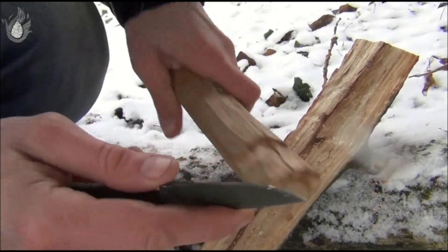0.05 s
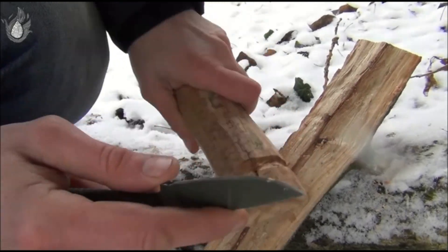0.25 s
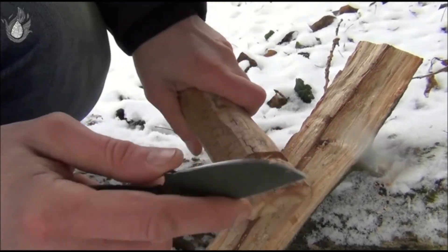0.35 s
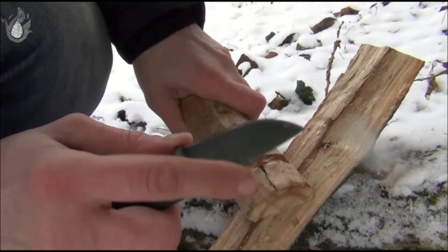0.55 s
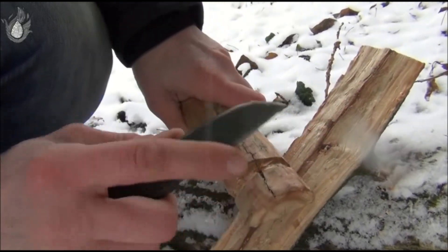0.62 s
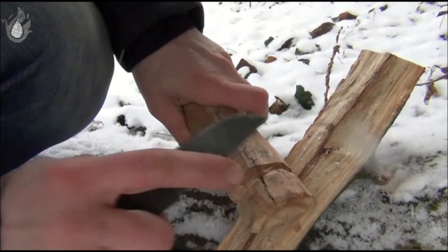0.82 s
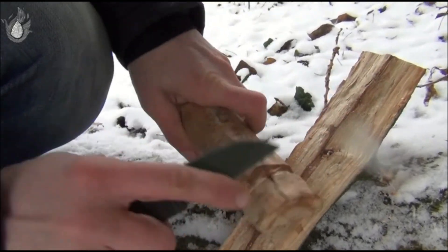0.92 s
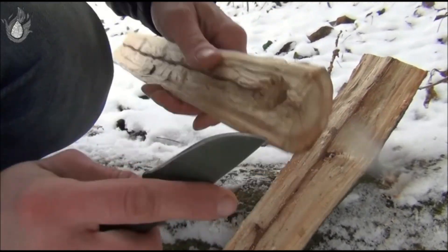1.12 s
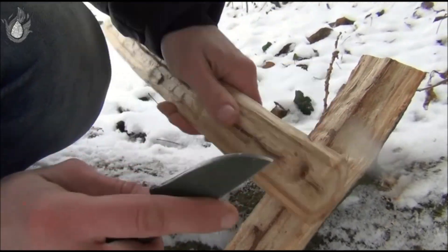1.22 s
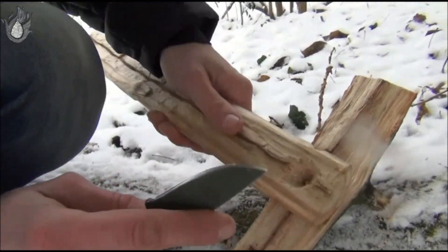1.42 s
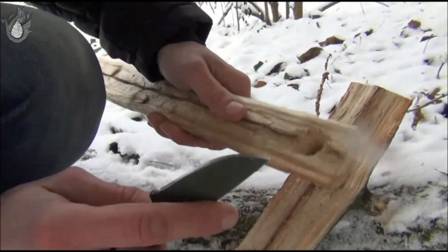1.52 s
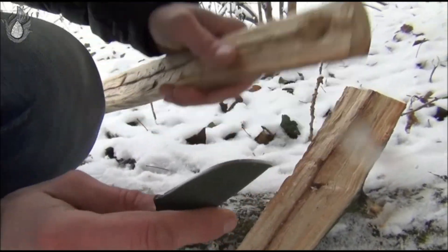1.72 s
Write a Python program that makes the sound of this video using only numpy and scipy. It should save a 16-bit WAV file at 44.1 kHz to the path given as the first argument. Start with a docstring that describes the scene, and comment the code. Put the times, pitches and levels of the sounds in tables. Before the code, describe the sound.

Wood knocks on wood six times, close to the microphone, each knock short and damped, the third brightest. Soft clothing rustle, one brief wooden slide and a few tiny bark ticks fill the gaps in a quiet outdoor setting.

```python
"""Snowy ground, close up: a split billet is set against a log in six dry knocks.
Each contact rings the wood's modes over a short crack, thumps the log and settles with a second touch;
the grip damps the ring. Around the knocks sleeves brush, grit and bark tick, and the wood bumps and
slides on wood. The surroundings return a short scatter over a faint outdoor hush."""
import sys
import numpy as np
from scipy import signal
from scipy.fft import rfft, irfft, next_fast_len
from scipy.io import wavfile
from scipy.ndimage import uniform_filter1d

SR = 44100
rng = np.random.default_rng(int(sys.argv[2]) if len(sys.argv) > 2 else 0)


def wrap_up_sound(samples):
    """Save the sound to the file named by the first command line argument, as 16-bit audio."""
    columns = np.atleast_2d(samples).T
    # keep every value between -1 and 1, then stretch to whole-number steps
    tamed = np.clip(columns, -1, 1)
    steps = np.round(tamed * 32767).astype(np.int16)
    wavfile.write(sys.argv[1], SR, steps)


N = 77175
CONTACT_S = 0.25


def amp(db):
    """Decibels to gain."""
    return 10 ** (np.asarray(db) / 20)


def unit(x):
    """Scale to rms 1."""
    return x / np.sqrt(np.mean(x ** 2) + 1e-20)


def along(hz, points):
    """Read (Hz, value) points on a log-frequency axis."""
    freqs, values = np.array(points, float).T
    return np.interp(np.log(np.maximum(hz, 1)), np.log(freqs), values)


def colour(x, points):
    """Minimum-phase filter through (Hz, dB) points."""
    n = 2 * next_fast_len(len(x))
    gain = amp(along(np.fft.rfftfreq(n, 1 / SR), points))
    cepstrum = irfft(np.log(gain), n)
    cepstrum[1:n // 2] *= 2
    cepstrum[n // 2 + 1:] = 0
    return irfft(rfft(x, n) * np.exp(rfft(cepstrum)), n)[:len(x)]


def add(out, x, start_s):
    """Mix x into out."""
    i = min(max(int(start_s * SR), 0), len(out))
    out[i:i + len(x)] += x[:len(out) - i]


def fade(t, t60_s):
    """Exponential decay, 60 dB in t60_s."""
    return np.exp(-np.log(1000) * t / t60_s)


def waver(rate_hz):
    """Slewed random steps, rms 1."""
    hold = int(SR / rate_hz)
    steps = np.repeat(rng.standard_normal(N // hold + 1), hold)
    return unit(uniform_filter1d(steps, hold)[:N])


# Outdoor background. Each row: frequency in Hz, relative spectral level in dB.
HUSH_SPECTRUM = [(20, -33), (35, -1), (55, 0.5), (85, -1), (125, -3), (200, -8), (350, -15), (650, -12),
                 (1200, -17.5), (2000, -22), (3500, -28.5), (7000, -38.5), (12000, -36.5), (16000, -27)]
# Its width. Each row: frequency in Hz, side minus mid in dB.
HUSH_WIDTH = [(30, 1), (80, -27), (300, -17.5), (1000, -28), (6000, -22.5), (12000, -8)]


def hush(level_db=-54.5, waver_db=0.4):
    """Low outdoor background, mostly alike in both ears."""
    mid, side = (unit(colour(rng.standard_normal(N), HUSH_SPECTRUM)) for _ in range(2))
    ears = mid + colour(side, HUSH_WIDTH) * np.array([[1], [-1]])
    return amp(level_db + waver_db * waver(rate_hz=7)) * ears


def rubbing(strokes, spectrum, flutter_db, catches_per_s=3700, spread_db=1.5):
    """Fibres catch and let go in dense tiny clicks; each stroke swells and dies unevenly."""
    t = np.arange(N) / SR
    power = 0
    for peak_s, rise_s, fall_s, db in strokes:
        width_s = np.where(t < peak_s, rise_s, fall_s)
        power += amp(db) ** 2 * np.exp(-2 * ((t - peak_s) / width_s) ** 2)
    catches = (rng.random(N) < catches_per_s / SR) * rng.choice([-1, 1], N)
    strength = amp(spread_db * np.minimum(rng.exponential(size=N), 4))
    friction = 0.86 * unit(catches * strength) + rng.standard_normal(N)
    flutter = amp(flutter_db * waver(rate_hz=89.5))
    return np.sqrt(power) * flutter * unit(colour(friction, spectrum))


# Arm movements. Each row: peak time, rise and fall in seconds, level in dB.
SLEEVE_STROKES = [(.06, 0.27, 0.024, -58.5), (.165, 0.083, 0.069, -54), (.288, 0.01, 0.011, -57),
                  (.365, 0.066, 0.063, -49), (.525, 0.023, 0.013, -59), (.595, 0.038, 0.023, -56.5),
                  (.665, 0.048, 0.02, -55), (.755, 0.11, 0.032, -62.5), (.9, 0.12, 0.15, -60),
                  (1.076, 0.026, 0.041, -50.5), (1.17, 0.054, .04, -50.5), (1.38, 0.21, 0.096, -59)]
# Cloth friction. Each row: frequency in Hz, relative level in dB.
SLEEVE_SPECTRUM = [(400, -4.5), (1000, 2), (1800, 1.5), (3000, 2), (4500, 2), (7000, 0), (11500, -0.5),
                   (14000, -1), (16000, -1)]


def sleeves():
    """Cloth brushes in soft, broadband strokes."""
    return rubbing(SLEEVE_STROKES, SLEEVE_SPECTRUM, flutter_db=2.0)


def taps(contacts, decay_s, half_width_octaves):
    """Light contacts: short noise bursts, each around one frequency."""
    out, t = np.zeros(N), np.arange(int(CONTACT_S * SR)) / SR
    hz = np.fft.rfftfreq(len(t), 1 / SR) + 1
    for start_s, db, centre_hz in contacts:
        rolloff = 1 + (np.log2(hz / centre_hz) / half_width_octaves) ** 2
        band = unit(irfft(rfft(rng.standard_normal(len(t))) / rolloff, len(t)))
        add(out, 2 * amp(db) * band * np.exp(-t / decay_s), start_s)
    return out


# Grit and bark contacts. Each row: start in seconds, relative level in dB, centre in Hz.
GRIT_TICKS = [(.003, -48.5, 9700), (1.390, -62, 7000), (1.497, -59, 7140), (1.587, -54.5, 8500),
              (1.587, -60, 4700), (1.622, -65, 7100)]


def grit():
    """Grit and bark give tiny bright ticks."""
    return taps(GRIT_TICKS, decay_s=0.0011, half_width_octaves=0.28)


# Wood modes. Each row: frequency in Hz, relative dB struck on the side, the same at the tip,
# nominal T60 in seconds.
BILLET_MODES = [(251.5, -12, -16, 0.079), (337, -1.5, -12, 0.038), (620.7, -6, 3.5, 0.045),
                (710, -3.5, -10, 0.01), (869, -9, -20, 0.074), (995, -5.5, -50, 0.12),
                (1090, -48, -17, 0.039), (1225, 2, -9, 0.064), (1348, 1, 4.5, 0.043), (1496, 0.5, 0, 0.027),
                (1738, -15, -27, 0.046), (2060, -9, -3, .028), (2420, -25, -10, 0.038),
                (2670, -50, -12, 0.043), (2690, -51, -16, .028), (3474, -35, -14, 0.017),
                (3380, -38, -9, 0.038), (4384, -22, -15, 0.048), (6880, -39, 4, 0.019),
                (9160, -36, 5, 0.015)]


def billet(t, ring_factor, bend_hz, clack_hz, place, grip_hz=600, delay_1khz_s=0.000903):
    """The place of contact weights the modes; the grip sets their decay, less so above grip_hz."""
    modes = [(bend_hz, 4, 0.079),  # lowest bending mode: pitch set by the support
             (clack_hz, 2, 0.035)]  # pitch set by the length from hand to contact
    for hz, side_db, tip_db, t60_s in BILLET_MODES:
        modes.append((hz, side_db + place * (tip_db - side_db), t60_s))
    out = 0
    for hz, db, t60_s in modes:
        age_s = np.maximum(t - delay_1khz_s * np.sqrt(1000 / hz), 0)  # low bending waves arrive later
        held_t60_s = t60_s * ring_factor ** min(1, grip_hz / hz)
        out += amp(db) * np.sin(2 * np.pi * hz * age_s) * fade(age_s, held_t60_s)
    return out


# Dense damped modes. Each row: centre in Hz, relative spectral level in dB, T60 in seconds.
CRACK_BANDS = [(200, 4.5, 0.074), (600, 7, 0.051), (1400, 6, 0.035), (2880, -2.5, 0.038),
               (5800, -2.5, 0.042), (14200, 8, 0.027)]


def crack(t, tick_db=5.5, tick_s=0.001):
    """Many heavily damped modes: a burst whose treble dies first, led by the tick of first contact."""
    noise = rfft(rng.standard_normal(len(t)))
    hz = np.fft.rfftfreq(len(t), 1 / SR)
    out = 0
    for centre_hz, db, t60_s in CRACK_BANDS:
        share = along(hz, [(row[0], row[0] == centre_hz) for row in CRACK_BANDS])
        out += amp(db) * irfft(noise * share, len(t)) * fade(t, t60_s)
    return out * (1 + amp(tick_db) * np.exp(-t / tick_s))


# The nine bands of a knock. Each entry: band edge in Hz.
KNOCK_EDGES_HZ = [130, 380, 540, 800, 1100, 1900, 3000, 4300, 7500, 16000]


def voice_blow(blow, band_db, window_s=0.02):
    """Equalise a blow toward the band levels given for its place and hardness (energy per window_s)."""
    edges_hz = np.array(KNOCK_EDGES_HZ, float)
    centres_hz = np.sqrt(edges_hz[1:] * edges_hz[:-1])
    hz = np.fft.rfftfreq(len(blow), 1 / SR)
    for _ in range(2):
        power = 2 * abs(rfft(blow)) ** 2 / (len(blow) * window_s * SR)
        now_db = 10 * np.log10(np.histogram(hz, edges_hz, weights=power)[0] + 1e-20)
        blow = colour(blow, list(zip(centres_hz, band_db - now_db)))
    return blow


# Billet on log. Each row: start in seconds, ring length factor, bending mode in Hz, clack in Hz,
# place (0 side, 1 tip), crack offset in dB, second touch delay in seconds, its gain in dB,
# then nine band levels in dB.
BILLET_KNOCKS = [(0.2153, 0.88, 475, 1980, 0.033, 0.87, 0.0045, -3, -34.5, -25.5, -29, -28.5, -26, -38.5, -50, -48, -52.5),
                 (0.3747, 0.66, 480, 2336, 0.34, -2, 0.0054, -11.5, -38.5, -37.5, -37, -37.5, -29, -32.5, -48, -54.5, -54),
                 (0.852, 1.07, 488, 2520, 1, 0.87, 0.0067, -8, -49.5, -38.5, -43, -47.5, -27.5, -28, -36.5, -35.5, -33),
                 (1.0139, 0.55, 475, 2477, 0.76, -2.8, .0032, -3.5, -36.5, -29.5, -27.5, -37.5, -28.5, -32.5, -46.5, -48, -45),
                 (1.3511, 1.34, 463, 2238, 0.046, 1, .0088, -19, -36, -34, -34, -32.5, -23.5, -33.5, -50, -54.5, -61.5),
                 (1.4501, 0.72, 469, 2183, 0.1, -1.8, 0.0054, -17.5, -38.5, -28.5, -35.5, -35.5, -24.5, -33.5, -38, -45, -48.5)]


def knocks(log_hz=180, log_db=-12, crack_db=4, touch_cutoff_hz=2700, low_cut_hz=150):
    """Each contact rings the billet, cracks, thumps the log and touches once more, duller."""
    out, t = np.zeros(N), np.arange(int(CONTACT_S * SR)) / SR
    thump = amp(log_db) * np.sin(2 * np.pi * log_hz * t) * fade(t, t60_s=0.09)
    dull = signal.butter(1, touch_cutoff_hz, fs=SR, output="sos")
    low_cut = signal.butter(4, low_cut_hz, "high", fs=SR, output="sos")
    for row in BILLET_KNOCKS:
        start_s, ring_factor, bend_hz, clack_hz, place, offset_db, touch_s, touch_db, *band_db = row
        ring = billet(t, ring_factor, bend_hz, clack_hz, place)
        blow, touch = (ring + amp(crack_db + offset_db) * crack(t) for _ in range(2))
        add(blow, amp(touch_db) * signal.sosfilt(dull, touch), touch_s)
        blow = signal.sosfilt(low_cut, blow + thump)
        add(out, voice_blow(blow, np.array(band_db)), start_s)
    return out


# Return from trees and ground. Each row: frequency in Hz, relative gain in dB.
SCATTER_RESPONSE = [(150, 0), (500, -4), (1400, -3), (2600, 6.5), (5000, 8), (14000, 0)]


def scatter(x, gain_db=-28, t60_s=0.25):
    """Trees and ground return a faint, short tail."""
    t = np.arange(N // 2) / SR
    tail = rng.standard_normal(len(t)) * fade(t, t60_s)
    echoes = signal.fftconvolve(x, tail / np.linalg.norm(tail))[:N]
    return amp(gain_db) * colour(echoes, SCATTER_RESPONSE)


# Settling contacts. Each row: start in seconds, relative level in dB, centre in Hz.
SETTLING_BUMPS = [(.2495, -46.5, 450), (1.584, -54, 600), (1.626, -53, 405)]


def settling():
    """The wood settles with soft, low bumps."""
    return taps(SETTLING_BUMPS, decay_s=0.006, half_width_octaves=0.45)


# Wood on wood. Each row: peak time, rise and fall in seconds, level in dB.
SLIDE_STROKES = [(1.217, 0.023, 0.034, -42), (1.265, .03, 0.023, -46.5)]
# Grain friction. Each row: frequency in Hz, relative level in dB.
GRAIN_SPECTRUM = [(290, -31), (500, -9), (1000, -7.5), (1570, -4), (1790, -3.5), (2890, -1), (4730, -7),
                  (5020, -7), (10500, -9), (16000, -10.5)]


def sliding():
    """Wood slides on wood with a brief rasp of the grain."""
    return rubbing(SLIDE_STROKES, GRAIN_SPECTRUM, flutter_db=1.6)


# Balance of the close sounds. Each row: frequency in Hz, left minus right in dB.
NEAR_BALANCE = [(125, .4), (250, -0.5), (500, -0.5), (1000, 1), (2000, -0.75), (4000, -0.6), (12000, 0.6)]
# Their width. Each row: frequency in Hz, side minus mid in dB.
NEAR_WIDTH = [(150, -25), (1000, -18.5), (2000, -39), (4000, -25), (8000, -12), (11000, -37)]


def scene():
    """Wood and sleeves straight ahead, slightly out of phase between the ears, over the hush."""
    near = knocks() + grit() + settling() + sleeves() + sliding()
    near += scatter(near)
    side = colour(np.imag(signal.hilbert(near)), NEAR_WIDTH)  # 90 degrees from mid
    left = colour(near, [(hz, db / 2) for hz, db in NEAR_BALANCE]) + side
    right = colour(near, [(hz, -db / 2) for hz, db in NEAR_BALANCE]) - side
    return np.array([left, right]) + hush()


# Microphone treble. Each row: frequency in Hz, gain in dB.
MIC_ROLLOFF = [(12500, 0), (15000, -10)]


def record(dry, cutoff_hz=15600):
    """The microphone dulls the top octave, then cuts off steeply."""
    dulled = np.array([colour(channel, MIC_ROLLOFF) for channel in dry])
    return signal.sosfilt(signal.ellip(8, 0.2, 70, cutoff_hz, fs=SR, output="sos"), dulled)


dry = scene()
out = record(dry)
wrap_up_sound(out)
```